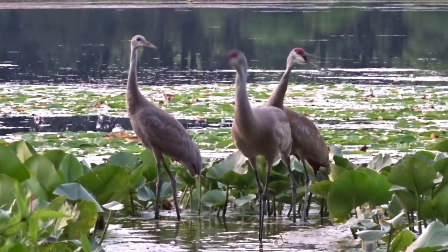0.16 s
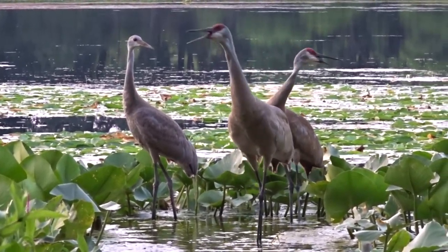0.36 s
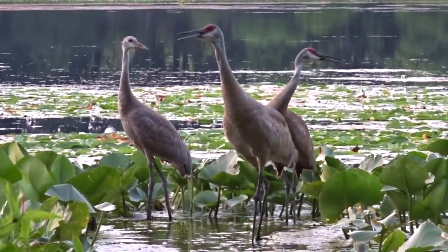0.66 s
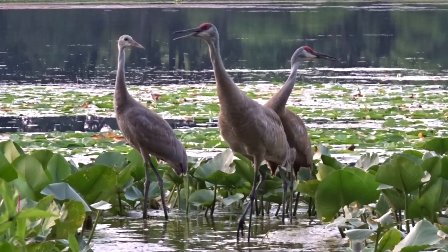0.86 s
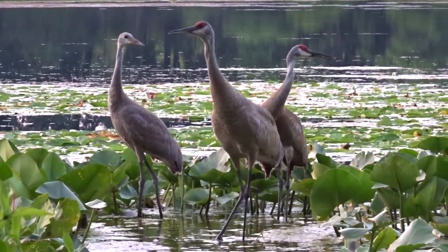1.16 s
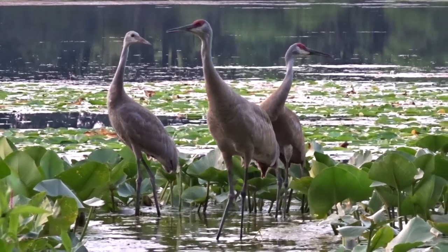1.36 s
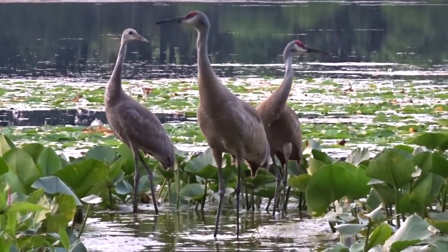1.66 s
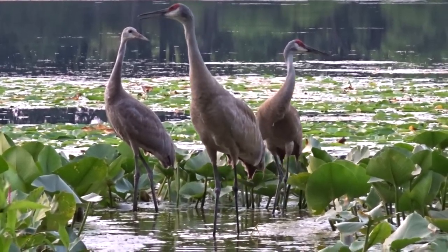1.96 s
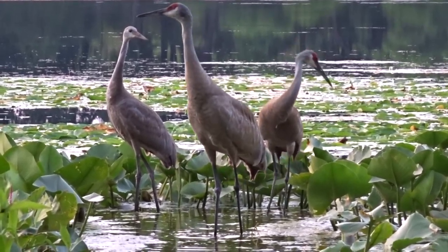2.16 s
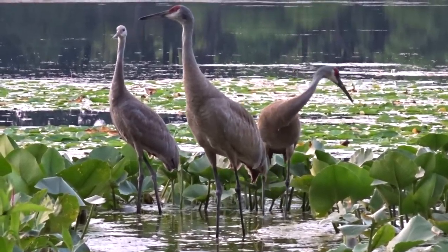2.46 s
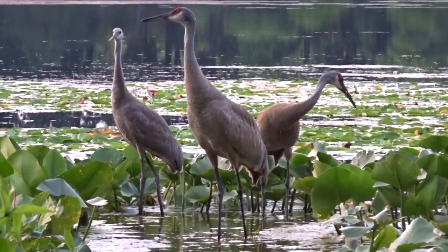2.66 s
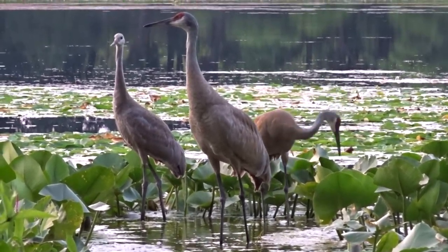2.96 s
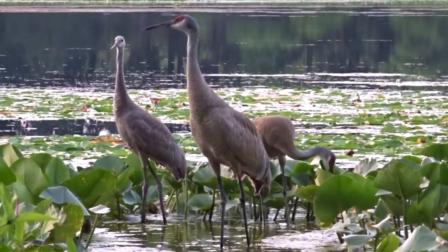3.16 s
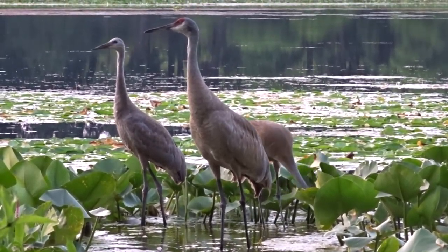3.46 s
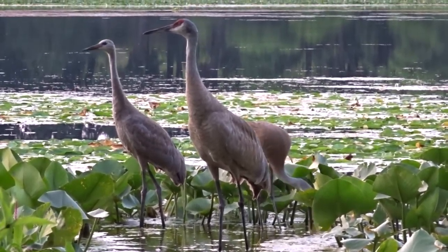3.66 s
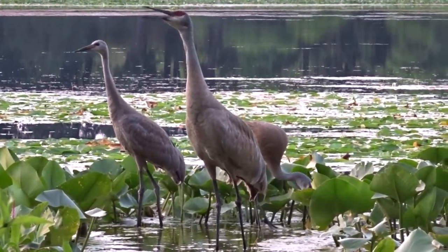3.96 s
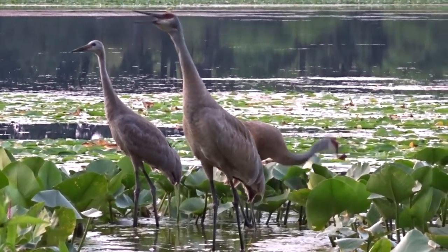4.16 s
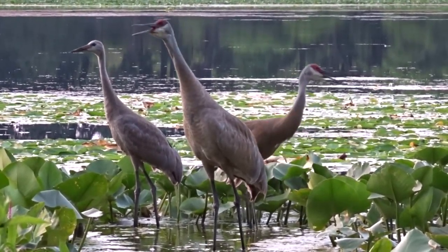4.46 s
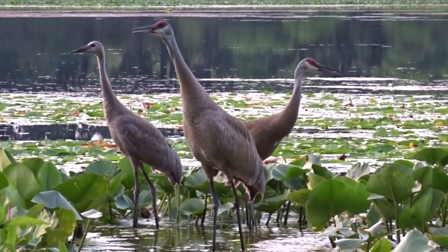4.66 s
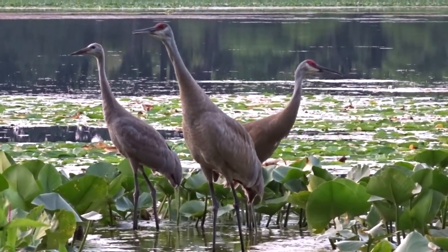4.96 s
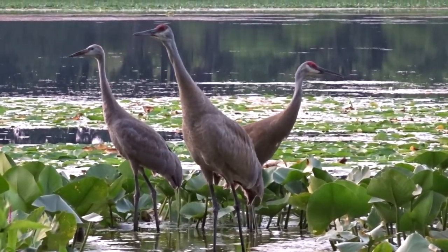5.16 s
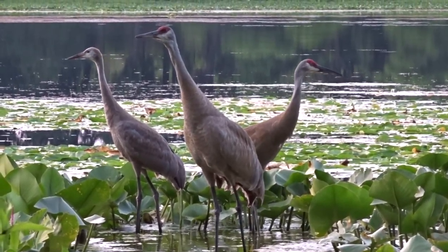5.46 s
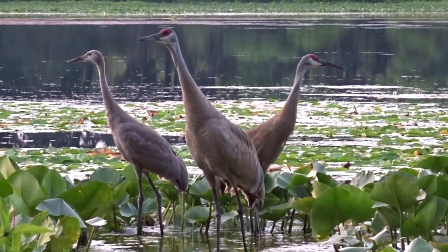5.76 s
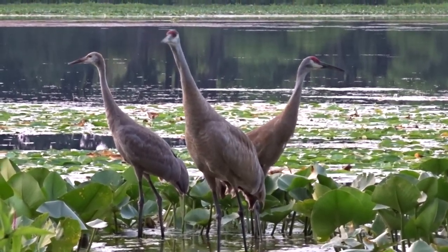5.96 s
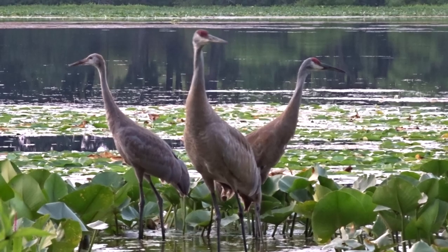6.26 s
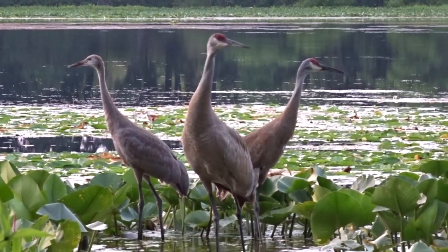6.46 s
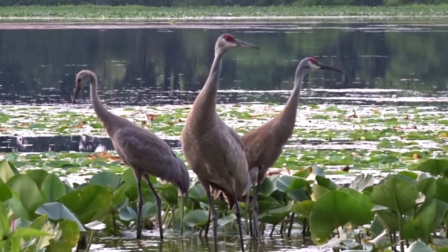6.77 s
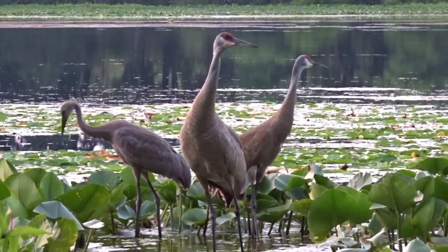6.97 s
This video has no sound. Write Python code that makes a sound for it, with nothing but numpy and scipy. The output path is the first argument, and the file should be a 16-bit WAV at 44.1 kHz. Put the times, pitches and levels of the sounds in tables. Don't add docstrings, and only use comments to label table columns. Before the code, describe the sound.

Outdoor wetland, stereo camera microphone with light hiss and a barely audible thin high whine. A pair of cranes, one higher and one lower in pitch, overlap in a resonant rolling rattle of rapid knocks, immediately at the opening. The sound scatters off the tree line and decays. After about three calm seconds with faint songbird chirps, they rattle again for under a second, then only low distant traffic and insects remain.

```python
import sys
import numpy as np
from scipy import signal
from scipy.io import wavfile

SR = 44100
rng = np.random.default_rng(int(sys.argv[2]) if len(sys.argv) > 2 else 0)


def wrap_up_sound(samples):
    columns = np.atleast_2d(samples).T
    tamed = np.clip(columns, -1, 1)
    steps = np.round(tamed * 32767).astype(np.int16)
    wavfile.write(sys.argv[1], SR, steps)


def to_linear_factor(level_db):
    exponent = np.asarray(level_db, float) / 20
    return 10 ** exponent


N = 313674


def rms_one(x):
    return x / np.sqrt(np.mean(x ** 2) + 1e-20)


def at_hz(points, hz):
    table = np.array(points)
    return np.interp(np.log(hz), np.log(table[:, 0]), table[:, 1])


def drift(rate_hz):
    r = np.exp(-2 * np.pi * rate_hz * 40 / SR)
    slow = signal.lfilter([1], [1, -2 * r, r * r], rng.standard_normal(N // 40 + 2002))[2000:]
    return np.interp(np.arange(N) / 40, np.arange(len(slow)), rms_one(slow))


def resonate(x, hz, width_hz):
    r = np.exp(-np.pi * width_hz / SR)
    poles = [1, -2 * r * np.cos(2 * np.pi * hz / SR), r * r]
    return signal.lfilter([(1 - r * r) / 2, 0, (r * r - 1) / 2], poles, x)


def bands(length):
    white = rng.standard_normal((2, 2, length))
    edges = 35 * 2 ** np.arange(0, 9.1, 1 / 3)
    for k, (low, high) in enumerate(zip(edges, edges[1:])):
        sos = signal.butter(2, [low, high], "band", fs=SR, output="sos")
        yield np.sqrt(low * high), signal.sosfilt(sos, white[k % 2])


def stereo(mid, side, alike):
    alike = np.clip(alike, 0, 1)
    return np.sqrt(1 + alike) * mid + np.sqrt(1 - alike) * side * [[1], [-1]]


# (time [s], level [dB])
ROAD_LEVEL = [
    (0, -58.5),
    (1.3, -54),
    (2.9, -57.5),
    (4.7, -57),
    (5.2, -50),
    (6.399, -53),
    (7.11, -53),
]
# (frequency [Hz], density [dB per Hz])
ROAD_SPECTRUM = [(24, -67.5), (40, -30), (91, -36.5), (162, -36), (268, -16.5), (387, -24), (490, -32),
                 (660, -7.5), (995, 1), (1340, -10.5), (1570, -10), (2070, -33), (2600, -29), (3380, -61.5),
                 (5720, -120)]
# (frequency [Hz], level [dB])
HISS_SPECTRUM = [(1290, -29.5), (2200, 1.5), (3970, 3.5), (4460, 5.5), (5130, 0.5), (12000, -7),
                 (12800, -5), (13300, -1), (13900, -10), (15300, -10), (16000, -14)]
# (frequency [Hz], left-right likeness [0-1])
BACKGROUND_COHERENCE = [(60, .6), (150, .93), (260, .93), (400, .7), (950, .82), (1600, .42), (2380, .1),
                        (6000, .05)]


def background(patchy_db):
    hiss_db = -65.5
    road, hiss, together = 0, 0, drift(2.5)
    for hz, (mid, side) in bands(N):
        pair = stereo(mid, side, at_hz(BACKGROUND_COHERENCE, hz))
        flicker_db = patchy_db * (.6 * together + drift(3.3))
        road = road + to_linear_factor(at_hz(ROAD_SPECTRUM, hz) + flicker_db) * pair
        hiss = hiss + to_linear_factor(at_hz(HISS_SPECTRUM, hz)) * pair
    s, drone_db = np.transpose(ROAD_LEVEL)
    road = rms_one(road) * to_linear_factor(np.interp(np.arange(N) / SR, s, drone_db))
    road[0] = np.roll(road[0], 3)
    return road + to_linear_factor(hiss_db) * rms_one(hiss)


# (frequency [Hz], level [dB rms])
WHINE_LINES = [
    (13127, -94.5),
    (13187, -79),
    (13247, -78),
    (13307, -88),
]


def whine():
    t = np.arange(N) / SR
    wander = 8.0 * np.cumsum(drift(8.0)) / SR
    side_phase = [[0], [1.4]]
    tone = sum(to_linear_factor(db) * np.sin(2 * np.pi * (hz * t + wander) + side_phase) for hz, db in WHINE_LINES)
    return tone * to_linear_factor(np.array([[1.5], [-1.5]]))


# (frequency [Hz], width [Hz], level [dB rms])
INSECT_BANDS = [
    (4500, 150, -77.5),
    (15230, 150, -94),
    (15740, 200, -100),
]
# (time [s], start frequency [Hz], end frequency [Hz], duration [ms], level [dB])
SONGBIRD_CHIRPS = [
    (1.868, 3500, 2880, 30, -63),
    (1.915, 3300, 3200, 7.1, -74),
    (3.052, 2800, 3250, 10, -60),
]


def small_life():
    out = np.zeros((2, N))
    for hz, width_hz, db in INSECT_BANDS:
        once = resonate(rng.standard_normal((2, N)), hz, width_hz)
        out += to_linear_factor(db + 1.5 * drift(3.0)) * rms_one(resonate(once, hz, width_hz))
    for s, start_hz, end_hz, ms, db in SONGBIRD_CHIRPS:
        n, i = round(ms * SR / 1000), round(s * SR)
        cycles = np.cumsum(np.linspace(start_hz, end_hz, n)) / SR
        out[:, i:i + n] += to_linear_factor(db) * np.hanning(n) * np.sin(2 * np.pi * cycles)
    return out


# (frequency [Hz], T60 [s])
MARSH_DECAY = [(400, 0.15), (700, 1.5), (1000, 1.1), (1500, 1), (3000, 0.87), (6000, 0.69), (11000, 0.59),
               (16000, 0.21)]
# (frequency [Hz], level [dB])
MARSH_SPECTRUM = [(200, -53), (400, -35.5), (550, -20.5), (680, -2.5), (850, -1), (1000, -4.5), (1300, -4),
                  (2200, -2.5), (3500, 1.5), (6000, 4), (8500, 2), (12000, 6.5)]
# (frequency [Hz], left-right likeness [0-1])
MARSH_COHERENCE = [(800, .95), (1600, .78), (3200, .45), (5000, .15), (9000, .08)]


def marsh(x, near_db, near_s):
    t = np.arange(SR * 3 // 2) / SR
    tail = 0
    for hz, pair in bands(len(t)):
        decay_db = at_hz(MARSH_SPECTRUM, hz) - 60 * t / at_hz(MARSH_DECAY, hz)
        tail = tail + to_linear_factor(decay_db) * stereo(*pair, at_hz(MARSH_COHERENCE, hz))
    tail = tail / np.sqrt(np.sum(tail[0] ** 2)) * (1 - np.exp(-t / 0.00059))
    tail = tail * (1 + to_linear_factor(near_db) * np.exp(-t / near_s))
    sent = x * (.45 + .9 * drift(450.0))
    return signal.fftconvolve(sent[None], tail, axes=1)[:, :N]


def syrinx(t, knock, chance, air, effort, lean, rebound, sag, wide):
    _, snap_db, hz, tone_db = knock
    late, size = chance
    ms_12, ms_per_db, us_12, us_per_db, longest_ms, widest_us = effort
    ms = np.clip(ms_12 + ms_per_db * (snap_db + 12), 4, longest_ms)
    us = np.clip(us_12 + us_per_db * (snap_db + 12), 14, widest_us)
    along = np.clip(t / (ms / 1000), 0, 1)
    swell = np.sin(np.pi * along ** lean) ** 0.51
    fall = sag - 0.01 * wide
    cycles = np.cumsum(hz * (1 - fall * np.minimum(2 * along - .65, 1) ** 2)) / SR
    at = np.interp(np.arange(16) + .5 + .04 * late, cycles, t)
    height = np.interp(at, t, swell) * to_linear_factor(snap_db + 1.3 * size)
    snaps = height @ (1 / (1 + ((t - at[:, None]) / (us * 1e-6)) ** 2))
    snaps = snaps + rebound * np.roll(snaps, round(.52 * SR / hz))
    soft = np.exp(-1e6 / (us * SR))
    air = signal.lfilter([1 - soft], [1, -soft], air)
    snaps = snaps + to_linear_factor(snap_db - 19) * swell * air
    tone = -to_linear_factor(tone_db + 1.0) * swell ** 2 * np.cos(2 * np.pi * cycles)
    return snaps, tone


def throat_colour(snaps, throat, mode):
    rung = sum(to_linear_factor(db + m) * resonate(snaps, hz, width_hz) for (hz, width_hz, db), m in zip(throat, mode))
    return rung - .85 * resonate(snaps, 2450, 800)


def bird(knocks, effort, throat, windpipe, lean, rebound, sag):
    open_bill_db, echo_loss_per_db, neck_shift = -18, 0.5, .04
    out, t = np.zeros((2, N)), np.arange(1200) / SR
    chance = rng.standard_normal((len(knocks), 3, 16))
    breath = rng.standard_normal((len(knocks), len(t)))
    trip_s, loss_db, dull_hz = windpipe
    dull = signal.butter(1, dull_hz, fs=SR)
    for knock, (late, size, mode), air in zip(knocks, chance, breath):
        wide = max(knock[3] - open_bill_db, 0)
        snaps, tone = syrinx(t, knock, (late, size), air, effort, lean, rebound, sag, wide)
        rung = throat_colour(snaps, throat, mode)
        echo = np.array([snaps + rung + tone, snaps + .2 * rung + .4 * tone])
        i = round(knock[0] * SR)
        lag = round(trip_s * (1 + neck_shift * mode[-1]) * SR)
        for turn in range(4):
            start = i + turn * lag
            out[:, start:start + len(t)] += echo
            echo = signal.lfilter(*dull, to_linear_factor(loss_db - echo_loss_per_db * wide) * echo)
    return out


# (time [s], snap level [dB], pulse rate [Hz], tone level [dB])
HIGH_KNOCKS = [(.0005, -51.5, 954, -44.5), (.1478, -13.5, 948, -21.5), (.2142, -11.5, 996, -18),
               (.2735, -11, 1019, -18), (.3290, -12.5, 999, -23.5), (.3830, -11, 1020, -19.5),
               (.4320, -10.5, 988.5, -22), (4.1455, -17, 978, -13.5), (4.2140, -20, 1035, -8.5),
               (4.2748, -17, 1081, -7.5), (4.3312, -11, 1018, -9.5), (4.3858, -8, 1046, -17),
               (4.4355, -7.5, 972.4, -19.5), (4.4835, -10.5, 890, -26.5)]
# (burst at -12 dB [ms], slope [ms/dB], snap at -12 dB [us], slope [us/dB],
# longest burst [ms], widest snap [us])
HIGH_BURST = (9.0, -0.29, 43.5, -0.5, 11.5, 70.5)
# (frequency [Hz], width [Hz], level [dB])
HIGH_RESONANCES = [(994, 90, 2), (1597, 70, 2), (3300, 610, -5.5), (4400, 450, -5), (5080, 880, 12),
                   (7900, 2500, 10), (12200, 12000, 5.5)]
# (round trip [s], loss [dB], dull above [Hz])
HIGH_TUBE = (.0088, -5.5, 4500)


def high_bird():
    return bird(HIGH_KNOCKS, HIGH_BURST, HIGH_RESONANCES, HIGH_TUBE, lean=.7, rebound=0.11, sag=0.14)


# (time [s], snap level [dB], pulse rate [Hz], tone level [dB])
LOW_KNOCKS = [(.0755, -19, 680, -35.5), (.2450, -24, 600, -33.5), (.2575, -19.5, 520, -20),
              (.3355, -5, 759.4, -26), (.3970, -10, 813, -28.5), (.4520, -7, 811.4, -29.5),
              (.5045, -5, 704.5, -23), (.5552, -5.5, 774, -25), (.6045, -8, 740.3, -24),
              (.6512, -9, 610, -23.5), (3.8670, -42.5, 625, -34), (3.9400, -20, 608, -25.5),
              (4.0082, -12, 810.4, -26), (4.0675, -9, 805, -20.5), (4.1262, -9, 796, -25),
              (4.1822, -6, 805, -42.5), (4.2358, -6.5, 819, -32.5), (4.2862, -5, 815, -27),
              (4.3402, -7.5, 751.4, -29.5), (4.3925, -7, 830, -38), (4.4425, -8, 782.6, -17.5),
              (4.4918, -11, 804.5, -28.5), (4.5400, -6, 631.7, -19.5)]
# (burst at -12 dB [ms], slope [ms/dB], snap at -12 dB [us], slope [us/dB],
# longest burst [ms], widest snap [us])
LOW_BURST = (8.0, -0.32, 45, -2, 7.5, 110.5)
# (frequency [Hz], width [Hz], level [dB])
LOW_RESONANCES = [(488, 55, 2.7), (931.4, 65, 11), (1590, 150, 3.1), (2075, 87, 7.7), (3200, 200, 9.4),
                  (4280, 530, 2), (4700, 660, 2.7), (6100, 980, 10.74), (13300, 5050, 5.5)]
# (round trip [s], loss [dB], dull above [Hz])
LOW_TUBE = (.0082, -6.5, 4500)


def low_bird():
    return bird(LOW_KNOCKS, LOW_BURST, LOW_RESONANCES, LOW_TUBE, lean=0.53, rebound=.25, sag=0.13)


def ports(x, share, scatter):
    treble = signal.sosfiltfilt(signal.butter(2, 3600, "high", fs=SR, output="sos"), x)
    side = (share + scatter * drift(400.0)) * treble
    return np.array([x + side, x - side])


def scene():
    front, around = high_bird() + low_bird()
    low_cut = signal.butter(3, 732, "high", fs=SR, output="sos")
    front = signal.sosfiltfilt(low_cut, front)
    direct = ports(front, share=.15, scatter=.3)
    birds = direct + to_linear_factor(1.0) * marsh(around, near_db=6.0, near_s=0.0063)
    return birds + background(patchy_db=0.72) + small_life() + whine()


def band_limit(x):
    return signal.sosfilt(signal.butter(12, 16970, fs=SR, output="sos"), x)


def record(dry):
    low = signal.filtfilt(*signal.butter(2, 2000, fs=SR), dry.mean(axis=0))
    heard = dry + 1.3 * np.gradient(low) * [[-1], [1]]
    treble = signal.filtfilt(*signal.butter(2, 10000, "high", fs=SR), heard)
    heard = heard + .22 * treble * [[1], [-1]]
    rounded = 2.354 * np.tanh(heard / 3.11)
    top_cut = signal.cheby2(16, 36, 15950, fs=SR, output="sos")
    mix = signal.sosfilt(top_cut, rounded)
    return band_limit(mix)


dry = scene()
out = record(dry)
wrap_up_sound(out)
```